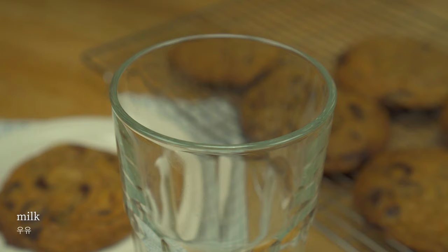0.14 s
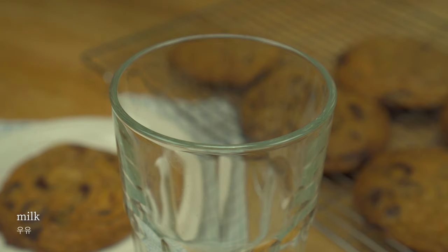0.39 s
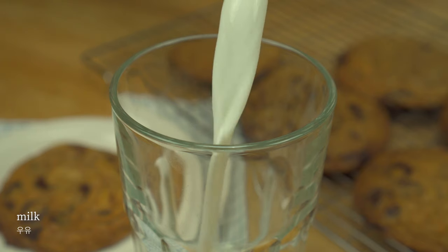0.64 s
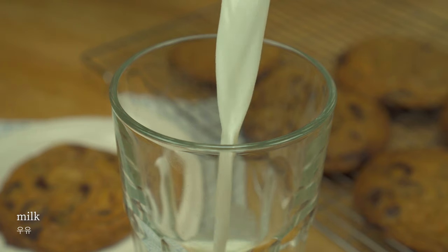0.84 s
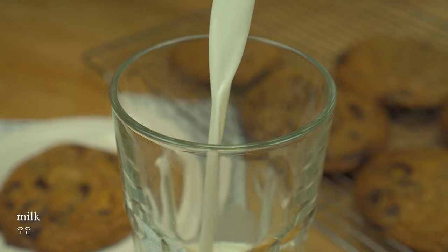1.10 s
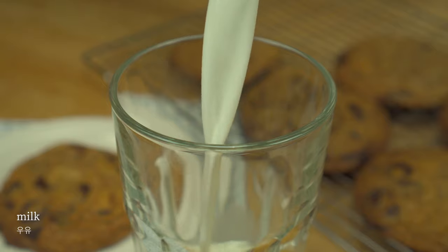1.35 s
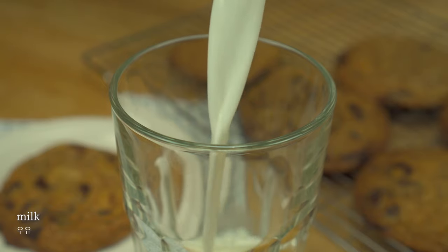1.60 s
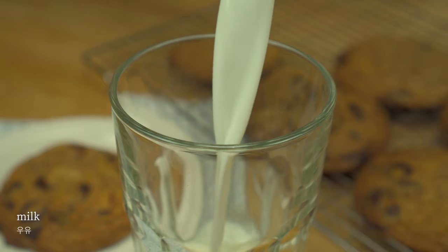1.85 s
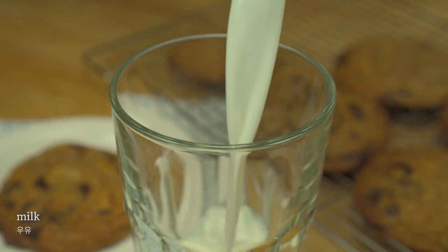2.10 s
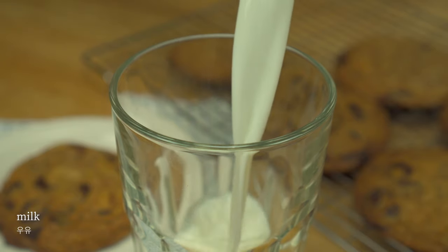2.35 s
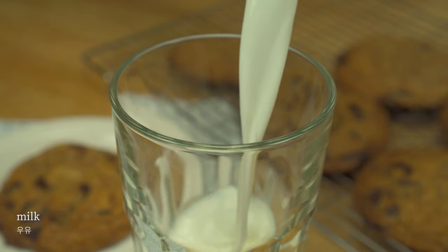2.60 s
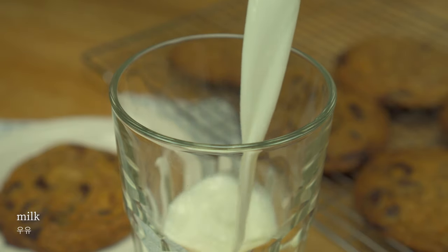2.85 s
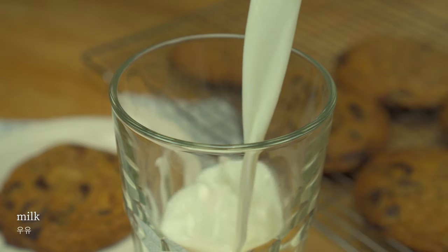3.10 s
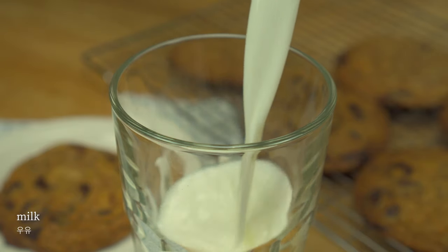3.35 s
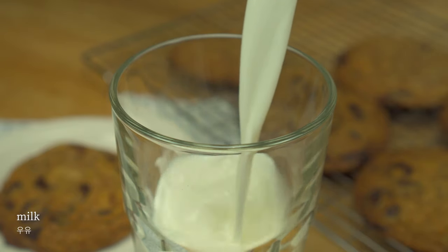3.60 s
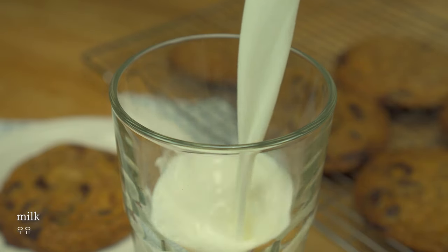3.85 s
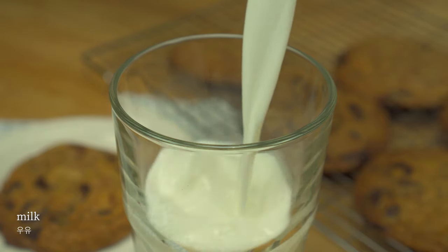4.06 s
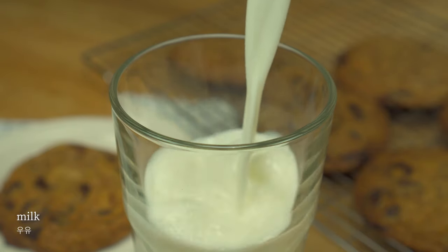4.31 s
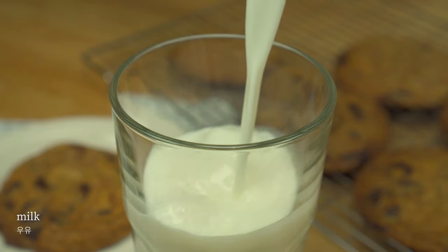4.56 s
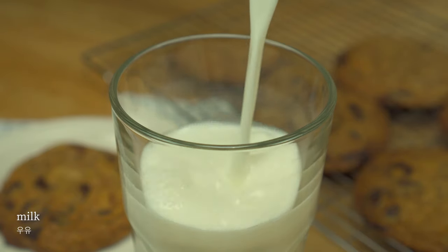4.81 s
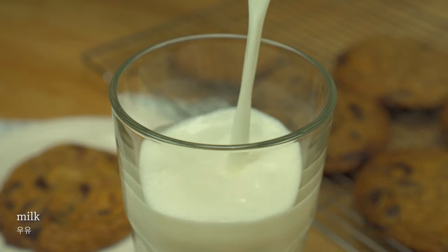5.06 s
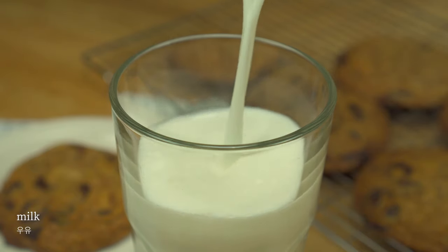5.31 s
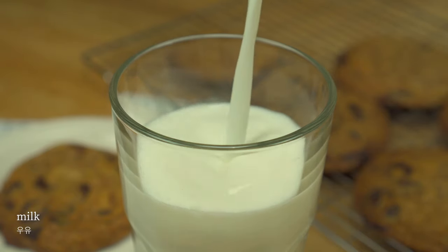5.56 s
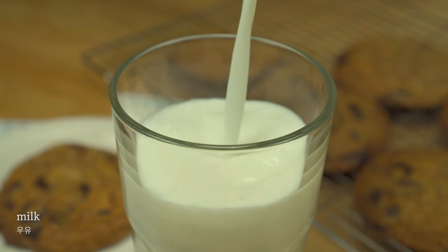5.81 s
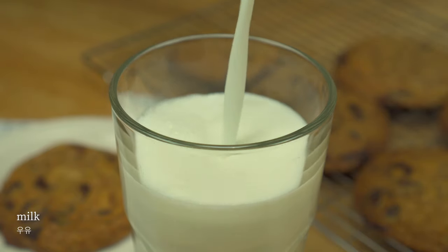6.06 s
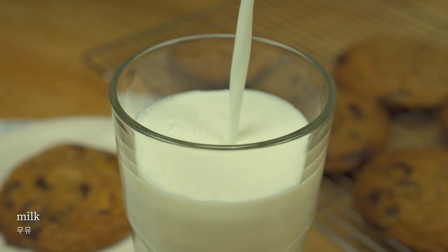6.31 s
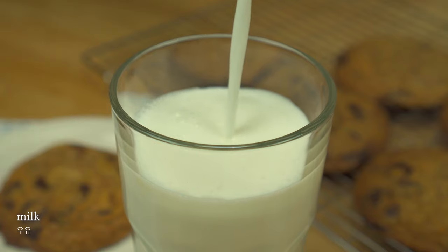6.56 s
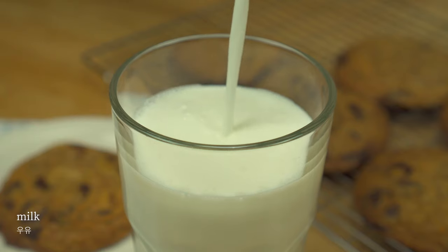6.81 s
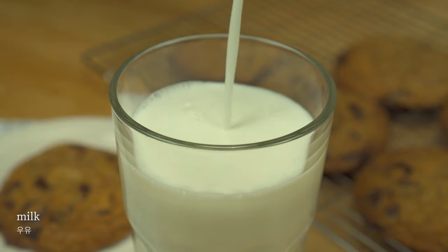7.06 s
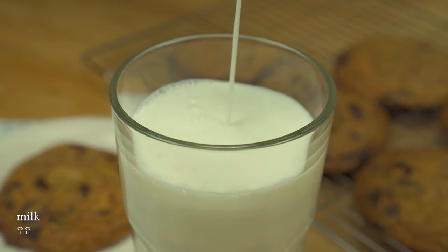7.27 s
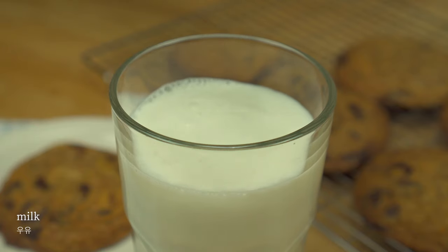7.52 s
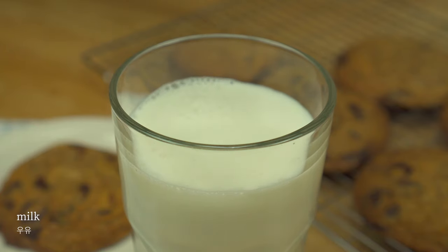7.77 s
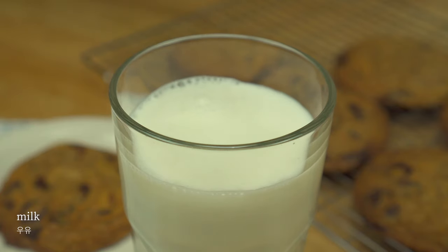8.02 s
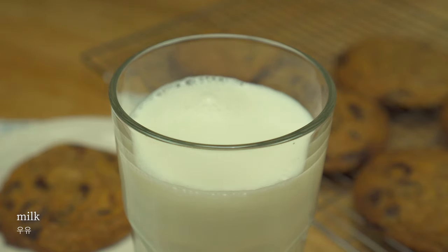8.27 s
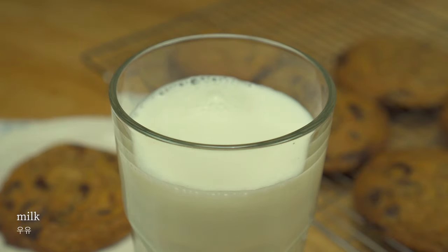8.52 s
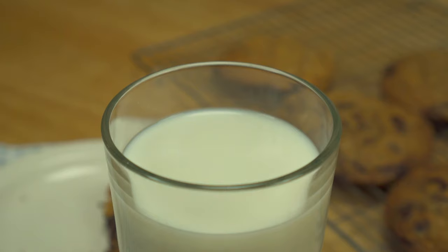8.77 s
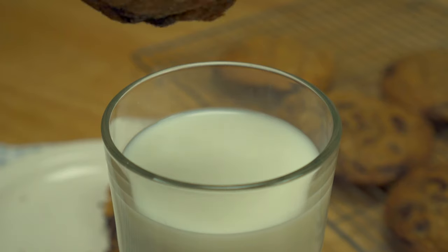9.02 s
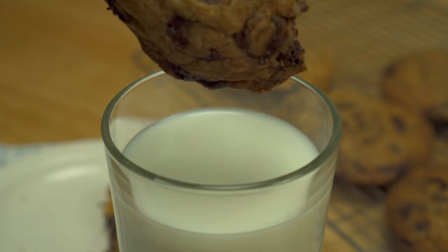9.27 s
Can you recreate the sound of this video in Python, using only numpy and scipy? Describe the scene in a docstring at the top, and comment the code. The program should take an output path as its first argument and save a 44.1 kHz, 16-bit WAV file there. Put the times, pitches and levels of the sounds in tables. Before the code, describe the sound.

Milk pours into a drinking glass, heard closely and equally in both channels with slight small-room reflection. The stream starts splashy and clumpy, full of ringing bubbles, low gurgles and fine spray, then eases into quiet plops and tiny fizzing pops. One final bubbly drip stands out near the end. Soft handling rustle and a dull bump follow, before the sound cuts away and room tone swells back.

```python
"""Milk is poured into a drinking glass in a quiet kitchen: the stream drags air under as ringing bubbles, spray
ticks on the glass wall, then the thin stream plops, foam crackles and a last drip falls.
Bubbles, ticks and plops are damped sines, air pockets hum as wavering tones, and shaped noise makes the jet's
rush, hiss and room tone. Twice all the sound drops out and swells back, each time after a soft rustle."""
import sys
import numpy as np
from scipy import signal
from scipy.fft import rfft, irfft, next_fast_len
from scipy.io import wavfile
from scipy.ndimage import uniform_filter1d, map_coordinates

SR = 44100
rng = np.random.default_rng(int(sys.argv[2]) if len(sys.argv) > 2 else 0)


def elevation(decibels):
    """Turn decibel levels (scalar or array-like) into linear amplitude ratios."""
    levels = np.asarray(decibels, float)
    return 10 ** (levels / 20)


def unload_wav(signal):
    """Save mono or channel-first audio to the path in sys.argv[1] as 16-bit WAV at rate SR, clipped to [-1, 1]."""
    wavfile.write(
        sys.argv[1],
        SR,
        np.round(np.clip(np.atleast_2d(signal).T, -1, 1) * 32767).astype(np.int16),
    )


N = 414099


def unit(x):
    """Scale to rms 1."""
    return x / np.sqrt(np.mean(x ** 2) + 1e-20)


def along(points, hz):
    """Read (Hz, value) points on a log frequency axis."""
    f, v = np.transpose(points)
    return np.interp(np.log(hz + 1), np.log(f + 1), v)


def curve(points, off=None):
    """Join (s, value) points, one value per sample; off applies outside them, else the ends hold."""
    s, v = np.transpose(points)
    return np.interp(np.arange(N) / SR, s, v, off, off)


def wobble(rate):
    """A smooth random curve with rate knots a second."""
    knots = rng.standard_normal(int(N * rate / SR) + 4)
    return map_coordinates(knots, [np.arange(N) * rate / SR])


def coloured(x, spectrum):
    """Filter x through a (Hz, dB) spectrum."""
    m = next_fast_len(N + 8192)
    gain = elevation(along(spectrum, np.fft.rfftfreq(m, 1 / SR)))
    return irfft(rfft(x, m) * gain, m)[:N]


def rings(s, db, hz, t60, rise, glide, size):
    """Damped sines that swell over rise cycles, peak near s and bend in pitch, ending at hz * (1 + glide)."""
    s, db, hz, t60, glide = (v[:, None] for v in np.broadcast_arrays(s, db, hz, t60, glide))
    t = np.arange(size) / SR
    swell = (1 - np.exp(-t * hz / rise)) ** 2
    bend = 1 + glide * np.minimum(t / t60, 1)
    wave = elevation(db - 60 * t / t60) * swell * np.sin(2 * np.pi * hz * t * bend)
    first = np.round((s - 2 * rise / hz) * SR).astype(int)
    at = np.clip(first + np.arange(size), 0, N)
    return np.bincount(at.ravel(), wave.ravel(), N + 1)[:N]


def swarm(count, hz, spread, cycles, spike_db, size, rise=1.6):
    """Random bubbles of log-normal pitch around the curve hz, mostly rising; a few are much louder."""
    when, big = rng.random((2, count))
    pitch = hz[(when * N).astype(int)] * np.exp(spread * rng.standard_normal(count))
    pitch = np.minimum(pitch, 15000)
    db = -spike_db * np.log(big + 0.014)
    glide = rng.normal(0.039, 0.04, count)
    # cycles: how many a bubble rings before it has died by 60 dB
    return unit(rings(when * N / SR, db, pitch, cycles / pitch, rise, glide, size))


def stream():
    """The plunging jet comes in clumps: small bubbles, a lower gurgle, and spray with its hiss."""
    # gushes, levels relative: start_s, length_s, small_bubbles_db, gurgle_db, spray_db
    gushes = [(0.657, 0.093, -71, -87, -66.5), (0.865, 0.12, -47.5, -61.5, -52),
              (0.982, 0.14, -34, -39.5, -53.5), (1.149, 0.095, -54, -44.5, -64.5),
              (1.305, 0.025, -45.5, -57.5, -64), (1.348, 0.083, -38.5, -37.5, -56.5),
              (1.51, 0.16, -31.5, -38, -57), (1.767, 0.042, -36, -45, -69),
              (1.87, 0.024, -53.5, -68.5, -73.5), (1.952, 0.14, -34.5, -44, -63),
              (2.188, 0.11, -42.5, -87, -83.5), (2.342, 0.14, -37, -53.5, -63.5),
              (2.549, 0.028, -35.5, -58.5, -60.5), (2.678, 0.035, -33, -72, -55.5),
              (2.756, 0.017, -48.5, -42, -73.5), (3.012, 0.11, -58, -72, -68.5),
              (3.355, 0.06, -45.5, -49, -61.5), (3.613, 0.13, -50, -56.5, -54.5),
              (3.694, 0.16, -45, -48.5, -62), (4.045, 0.039, -59, -58.5, -78),
              (4.137, 0.022, -55, -51, -90), (4.255, 0.052, -53.5, -55, -70.5),
              (4.504, 0.13, -58.5, -54.5, -83), (4.983, 0.03, -59, -59, -99), (7.415, 0.045, -68, -87, -60)]
    # flow between gushes: time_s, relative level_db of its small bubbles
    trickle = [(.62, -87), (.86, -62.5), (1, -65.5), (2.6, -50), (3.3, -48), (3.5, -56), (4.4, -67.5),
               (5.7, -74.5)]
    # centre of the small bubbles: time_s, pitch_hz
    small_pitch = [(1.0, 3210), (1.7, 2960), (2.3, 3730), (3.2, 3055)]
    attack_s, fall_db_per_s = 0.018, 225.5
    t = np.arange(N) / SR

    # rows: small bubbles, gurgle, spray
    flow = elevation([[0], [-12], [-26.5]]) * elevation(curve(trickle, -120))
    for s, length, *dbs in gushes:
        attack = np.clip((t - s) / attack_s, 0, 1)
        fall = elevation(-fall_db_per_s * np.clip(t - s - length, 0, 1))
        flow = flow + elevation(dbs)[:, None] * attack * fall

    clump = wobble(45)
    flat = np.ones(N)
    small = swarm(count=8500, hz=curve(small_pitch), spread=0.16, cycles=70, spike_db=4.0, size=450)
    gurgle = swarm(count=2500, hz=1400 * flat, spread=0.2574, cycles=38.6, spike_db=3.5, size=1300)
    bubbles = flow[0] * elevation(4.57 * clump) * small + flow[1] * elevation(3.77 * clump) * gurgle

    drops = swarm(count=3200, hz=9500 * flat, spread=0.37, cycles=12, spike_db=1.5, size=120, rise=0.34)
    hiss = unit(np.diff(rng.standard_normal(N + 1)))
    spray = flow[2] * elevation(6.5 * clump + 3.5 * wobble(67)) * (drops + 0.85 * hiss)
    return bubbles, spray


def jet_rush(bubbles):
    """Turbulence is noise that follows the bubbles' strength; a colour turns it into the jet's rush."""
    # colour of the rush: frequency_hz, level_db
    rush_colour = [(1000, -12.5), (2400, 5), (3300, -12), (4500, -15.5), (8000, -30.5)]
    churn = uniform_filter1d(np.abs(bubbles), size=900) * rng.standard_normal(N)
    return churn, 0.88 * coloured(churn, rush_colour)


def clear_rings():
    """Each starts with a tick, as a bubble pinches off, and a quieter, slightly detuned second ring thickens it."""
    # the clearest bubbles, and one ring of the glass at 0.88 s: peak_s, relative level_db, pitch_hz, t60_ms
    ring_list = [(0.7, -35, 6200, 4), (0.775, -42.5, 6940, 9.9), (0.878, -43, 3620, 40),
                 (0.88, -41, 5620, 93), (0.915, -16, 4060, 4.5), (0.958, -26.5, 3410, 19),
                 (1.016, -17, 2700, 5.4), (1.037, -22.5, 6940, 4.5), (1.038, -34.5, 838, 59),
                 (1.042, -27, 1770, 25), (1.104, -36, 1240, 62), (1.112, -30.5, 2850, 46),
                 (1.199, -24.5, 3490, 10.6), (1.218, -29, 4460, 15.4), (1.298, -29, 2030, 34),
                 (1.327, -30.5, 1580, 31), (1.363, -29, 6400, 10.5), (1.431, -19.5, 3000, 4.8),
                 (1.483, -22, 3540, 8.2), (1.519, -26, 3000, 23), (1.577, -24, 2725, 28),
                 (1.906, -29.5, 3380, 8.3), (1.687, -22.5, 2730, 11), (1.697, -13.5, 4350, 4.9),
                 (1.777, -26, 2990, 18), (1.816, -22.5, 3140, 22), (1.885, -29.5, 3220, 13),
                 (1.97, -17, 3530, 4.4), (1.981, -27, 1030, 24), (1.981, -23.5, 3380, 21),
                 (2.034, -26, 3360, 34), (2.038, -24.5, 807, 66), (2.053, -27.5, 3930, 18),
                 (2.131, -17.5, 3350, 9.4), (2.142, -12.5, 3620, 4.3), (2.158, -29.5, 3920, 33),
                 (2.195, -30, 2030, 20), (2.218, -34, 2085, 20), (2.253, -31, 6950, 10.5),
                 (2.295, -15.5, 3770, 4.3), (2.311, -20, 3670, 4.8), (2.397, -20.5, 2040, 8.2),
                 (2.439, -24, 2080, 14.3), (2.582, -19, 4980, 5.1), (2.591, -22, 5600, 3.3),
                 (2.714, -32.5, 3960, 33), (2.729, -27, 4040, 10.6), (2.77, -23.5, 2030, 9.1),
                 (3.011, -31.5, 4550, 5.9), (3.092, -24, 3070, 18), (3.108, -20, 3600, 8.5),
                 (3.173, -29.5, 2540, 13), (3.228, -21.5, 2940, 5), (3.278, -34.5, 2850, 16),
                 (3.342, -33.5, 2950, 23), (3.391, -24, 5800, 3), (3.545, -44, 2910, 17),
                 (3.556, -36, 1210, 14), (3.572, -38.5, 2560, 11.5), (3.721, -30.5, 4380, 11),
                 (3.722, -32.5, 1202, 31), (3.744, -14.5, 5400, 2.8), (3.751, -31, 1127, 29),
                 (3.774, -24, 6800, 2.2), (3.776, -22, 1250, 11), (3.79, -20, 1142, 36),
                 (3.801, -31, 6980, 10), (3.869, -31, 4300, 8.9), (3.891, -37.5, 3050, 12),
                 (3.929, -39.5, 3010, 12), (4.06, -46.5, 3000, 52), (4.163, -42.5, 5430, 7.5),
                 (4.259, -38.5, 4130, 28), (4.274, -30.5, 5160, 4.4), (4.298, -42, 3030, 18),
                 (4.527, -35.5, 3170, 6.9), (4.578, -35.5, 3250, 4.4), (4.995, -45, 3190, 27),
                 (5.351, -47, 3100, 28), (5.608, -36.5, 3770, 7.1), (6.072, -35, 2370, 6.7),
                 (6.098, -49.5, 3490, 20), (6.18, -55, 3580, 23), (6.836, -45, 2980, 19),
                 (7.449, -34, 2835, 24), (7.49, -20.5, 4370, 5.1)]
    s, db, hz, t60_ms = np.transpose(ring_list)
    t60 = t60_ms / 1000
    chance = rng.standard_normal((len(s), 4))
    tone = rings(s, db + 5.5, hz, t60, rise=1.2, glide=.03, size=3000)
    second_s = s + 0.0009 * np.abs(chance[:, 0])
    detuned_hz = hz * np.exp(.07 * chance[:, 1])
    tone += rings(second_s, db + 1.0, detuned_hz, t60, rise=1.394, glide=0.015 * chance[:, 2], size=3000)
    tick_db = db - 11.5 + 3 * chance[:, 3]
    tick = rings(s - 4 / hz, tick_db, 7000, .0012, rise=0.2, glide=0, size=64)
    return tone, tick


def pockets():
    """A wavering tone each: the pocket sinks fast in pitch as it opens, or climbs slowly as it nears the
    surface, is jostled by the churning milk and dies."""
    # humming air pockets: start_s, relative level_db, first_hz, settled_hz, t60_s
    air_pockets = [(0.998, -57, 640, 646, 2.9), (1.01, -45, 799, 1244, 0.63),
                   (1.24, -44.5, 1600, 2290, 0.36), (1.271, -37.5, 1373, 1636, 0.2),
                   (1.563, -51, 1158, 1206, 0.65), (1.97, -46, 985.6, 782, 1.5),
                   (2.01, -39.5, 2070, 1883, 0.55), (2.057, -35.5, 754.5, 696.4, 0.22),
                   (2.199, -42, 771, 780, 0.44), (2.357, -40.5, 821, 795.6, 0.66),
                   (3.54, -64, 548, 547, 2.6), (3.718, -48.5, 541, 538, 0.39),
                   (3.78, -39.5, 512, 505, 0.15), (3.698, -52, 1227, 1179, 0.44),
                   (3.769, -35.5, 1134, 1100, 0.34), (4.038, -53, 1060, 1079, 0.17),
                   (4.139, -61, 1070, 1077, 1.1), (4.494, -49, 2620, 1653, 0.55),
                   (4.526, -48, 1573, 1665, 0.39), (7.42, -41, 2035, 1820, 0.43),
                   (7.44, -51.5, 5940, 5870, 0.4), (7.49, -62, 4440, 4460, 0.54)]
    sink_s, climb_s, swell_cycles, jostle_db = .014, .07, 2.2, 3
    out = np.zeros(N)
    for s, db, first_hz, settled_hz, t60 in air_pockets:
        t = np.maximum(np.arange(N) / SR - s, 0)
        slide_s = sink_s if first_hz > settled_hz else climb_s
        pitch = settled_hz + (first_hz - settled_hz) * np.exp(-t / slide_s)
        phase = np.cumsum(2 * np.pi * pitch / SR)
        swell = (1 - np.exp(-t * first_hz / swell_cycles)) * elevation(db - 60 * t / t60)
        # random sine and cosine parts blur the tone
        rate = min(.18 * settled_hz, 600)
        out += swell * ((.5 + wobble(rate)) * np.sin(phase) + wobble(rate) * np.cos(phase))
    return out * elevation(jostle_db * wobble(55))


def ticks():
    """Spray drops and a high burst of froth: each is a sudden cluster of very short, high rings."""
    # sharp ticks: peak_s, relative level_db
    sharp_ticks = [(0.9433, -29.5), (0.959, -29.5), (1.0311, -31), (1.058, -34), (1.1378, -35),
                   (1.2017, -40), (1.3857, -36), (1.4242, -27.5), (1.9594, -42), (2.4374, -34),
                   (2.6728, -34), (2.7671, -32), (3.7199, -33.5), (3.7369, -31.5), (6.4668, -55),
                   (7.43, -47.5), (7.448, -36.5), (7.488, -41)]
    s, db = np.repeat(sharp_ticks, 8, axis=0).T
    chance = rng.standard_normal((len(s), 3))
    hz = np.clip(10140 * np.exp(0.36 * chance[:, 0]), 3000, 14500)
    late_s = s + 0.00044 * np.abs(chance[:, 1])
    return rings(late_s, db - 4.5 + 3 * chance[:, 2], hz, t60=0.0084, rise=0.51, glide=0, size=300)


def plops():
    """The thin stream breaks the surface bluntly: a single low push each, hardly ringing."""
    # plops: peak_s, relative level_db
    blunt_plops = [(3.553, -46), (4.142, -48), (4.873, -43), (4.993, -40), (5.273, -42), (5.382, -42)]
    s, db = np.transpose(blunt_plops)
    hz = 920 * np.exp(0.36 * rng.standard_normal(len(s)))
    return rings(s, db + 9.5, hz, t60=0.0038, rise=0.21, glide=0, size=600)


def foam():
    """Tiny films burst ever higher as the froth settles; larger films pop one by one."""
    # bursting froth: time_s, relative level_db
    froth_level = [(3.9, -77), (5, -57.5), (7.3, -59), (8.76, -56.5)]
    # larger films that pop: peak_s, relative level_db
    film_pops = [(4.9492, -45.5), (5.1187, -48), (5.1584, -53), (5.2974, -48), (5.4257, -47), (5.4694, -47),
                 (5.5114, -47.5), (5.8113, -45), (6.2514, -43), (6.9765, -48.5), (8.051, -46)]
    rising_hz = np.linspace(4000, 9000, N)
    crackle = swarm(count=550, hz=rising_hz, spread=0.42, cycles=8.7, spike_db=4.0, size=100, rise=.4)
    s, db = np.transpose(film_pops)
    hz = 6050 * np.exp(0.16 * rng.standard_normal(len(s)))
    pops = rings(s, db + 9, hz, t60=0.0044, rise=0.63, glide=0, size=300)
    return elevation(curve(froth_level, -120) - 15 + 2.2 * wobble(7.1)) * crackle + pops


def glass(knocks):
    """Splashing rings the wall at ever other spots, so each mode comes and goes by itself."""
    # wall modes: pitch_hz, relative level_db, t60_s
    wall_modes = [(2650, -8.5, 0.14), (5670, 4, 0.042), (9600, -12.5, 0.066), (11500, -11, 0.043)]
    damping_db_per_s_khz = 0.65  # the rising milk muffles the higher modes first
    t, clock = np.arange(SR // 5) / SR, np.arange(N) / SR
    out = np.zeros(N)
    for hz, db, t60 in wall_modes:
        drive_db = 4.1 * wobble(24.94) - 40 - damping_db_per_s_khz * clock * hz / 1000
        ring = elevation(db - 60 * t / t60) * np.sin(2 * np.pi * hz * t)
        out += signal.fftconvolve(knocks * elevation(drive_db), ring)[:N]
    return out


def through_mouth(x):
    """The glass colours what it radiates, with the cross modes of its air."""
    # radiation of the glass: frequency_hz, level_db
    mouth_colour = [(100, -27), (500, -9), (2000, -7), (2450, -10), (3300, -9.5), (5000, 1), (6500, 9),
                    (8200, -6), (9200, -1.5), (15000, -12)]
    return coloured(x, mouth_colour)


def kitchen(x):
    """A delayed noise tail of unit energy: each frequency of the room's answer dies at its own speed."""
    # decay of the room: frequency_hz, t60_s
    room_decay = [(300, 0.51), (2000, 0.33), (6000, 0.18), (14000, 0.088)]
    hz, t, z = signal.stft(rng.standard_normal(SR // 2), SR, nperseg=256)
    decay = elevation(-60 * t / along(room_decay, hz)[:, None])
    tail = signal.istft(z * decay, SR, nperseg=256)[1]
    delayed = np.pad(x, (250, 0))  # samples
    return signal.fftconvolve(delayed, tail / np.linalg.norm(tail))[:N]


def thuds():
    """Dull bumps of handling, each a blurred cluster of low rings."""
    # soft low pushes: centre_s, level_db of each ring, pitch_hz, t60_s
    soft_pushes = [(.635, -55, 91, 0.21), (8.7, -52.5, 520, 0.17)]
    s, db, hz, t60 = np.repeat(soft_pushes, 6, axis=0).T
    chance = rng.standard_normal((len(s), 2))
    pitch = hz * np.exp(0.2 * chance[:, 1])
    return rings(s + .02 * chance[:, 0], db, pitch, t60, rise=1.89, glide=0, size=6000)


def background():
    """Slightly unsteady room tone whose level moves in steps, and a soft rustle: both coloured noise."""
    # room tone levels: start_s, level_db
    tone_levels = [(0, -60.5), (.135, -66.5), (0.631, -63), (8.762, -66)]
    # colour of the room tone: frequency_hz, relative level_db_per_hz
    tone_colour = [(25, -43.5), (43, -23), (99, -12), (194, -4), (261, -7.5), (392, -10.5), (672, -17.5),
                   (1780, -21.5), (12000, -37.5), (15800, -47)]
    # one level curve per rustle: time_s, level_db
    rustle_curves = [
        [(0, -65), (.05, -90.5), (.07, -65), (.135, -64)],
        [(7.6, -76), (7.9, -66.5), (8.3, -61.5), (8.6, -63), (8.76, -59.5)],
    ]
    # colour of the rustle: frequency_hz, relative level_db_per_hz
    rustle_colour = [(120, -27), (200, -9), (469, -4.5), (890, -7.5), (3500, -12.5), (14000, -32)]
    start, db = np.transpose(tone_levels)
    level_db = db[np.searchsorted(start, np.arange(N) / SR, "right") - 1]
    unsteady_db = .7 * wobble(5.5)
    tone = elevation(level_db + unsteady_db) * unit(coloured(rng.standard_normal(N), tone_colour))
    rustle_level = sum(elevation(curve(points, -120)) for points in rustle_curves)
    return tone + rustle_level * unit(coloured(rng.standard_normal(N), rustle_colour))


def fades():
    """A gain that drops almost to silence at each given time and swells back within about 41 ms."""
    # sudden drops in level: time_s
    drop_times = [.135, 8.762]
    t = np.arange(N) / SR
    gain = np.ones(N)
    for s in drop_times:
        swell = np.clip(0.018 + (t - s) / 0.042, 0, 1) ** 3.3
        gain *= np.where(t < s, 1, swell)
    return gain


def scene():
    """All of it reaches one microphone, heard alike in both channels."""
    tone, tick = clear_rings()
    bubbles, spray = stream()
    churn, rush = jet_rush(bubbles)
    splash = bubbles + rush + tick + spray + ticks()
    wall = glass(splash + churn)  # the turbulent jet rubs the wall too
    milk = tone + pockets() + plops() + foam() + through_mouth(splash + wall)
    milk = milk + elevation(-14.5) * kitchen(milk)
    return np.tile((milk + background() + thuds()) * fades(), (2, 1))


def top_cut(x):
    """Nothing passes above the cut-off."""
    return signal.sosfilt(signal.butter(12, 16440, fs=SR, output="sos"), x)


def record(dry):
    """A steep band limit removes everything from 15.9 kHz up."""
    m = next_fast_len(N)
    passed = np.fft.rfftfreq(m, 1 / SR) < 15900  # Hz
    limited = irfft(rfft(dry, m) * passed, m)[:, :N]
    return top_cut(limited)


dry = scene()
out = record(dry)
unload_wav(out)
```